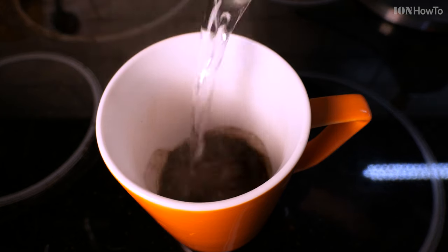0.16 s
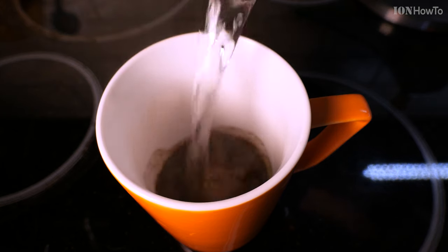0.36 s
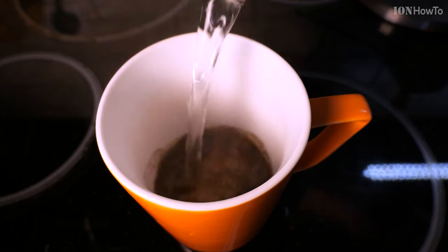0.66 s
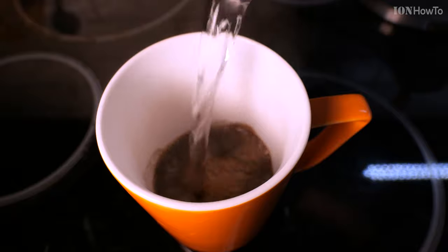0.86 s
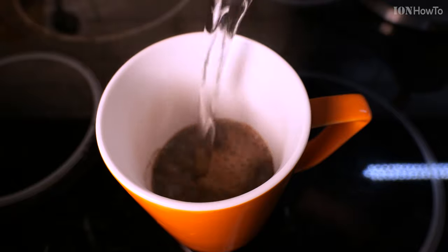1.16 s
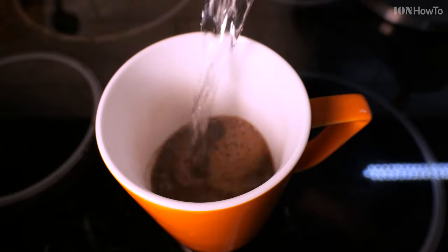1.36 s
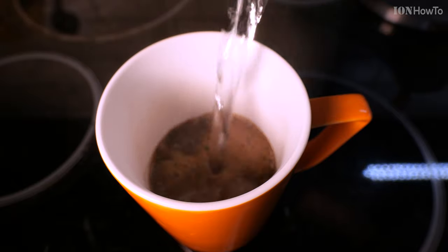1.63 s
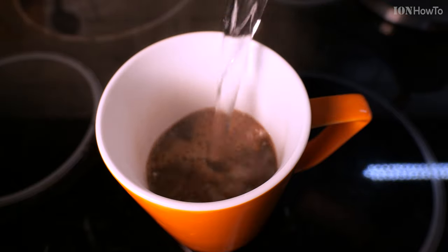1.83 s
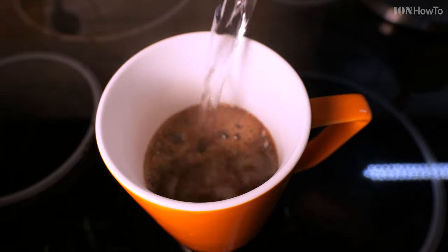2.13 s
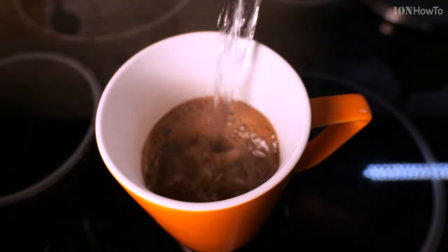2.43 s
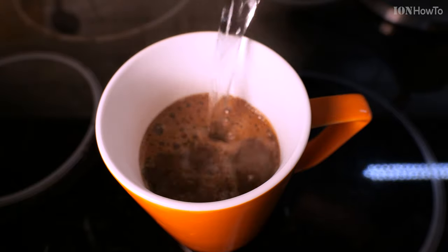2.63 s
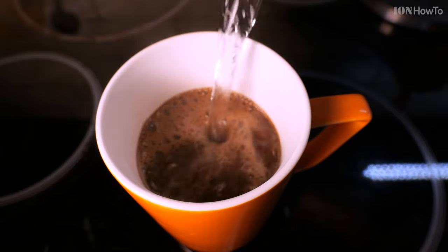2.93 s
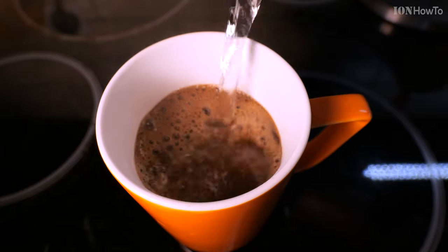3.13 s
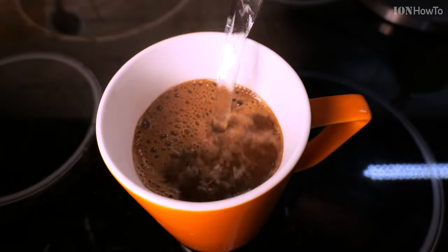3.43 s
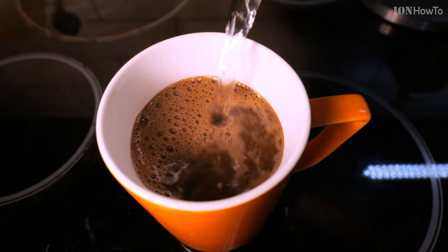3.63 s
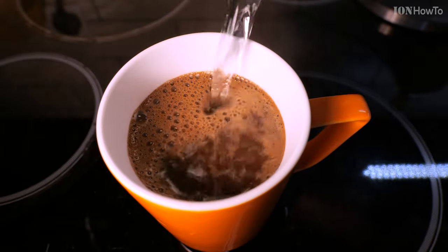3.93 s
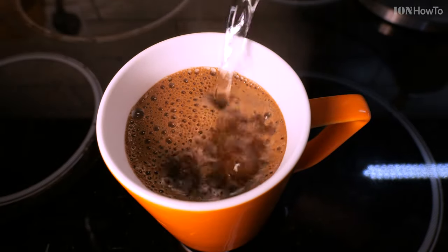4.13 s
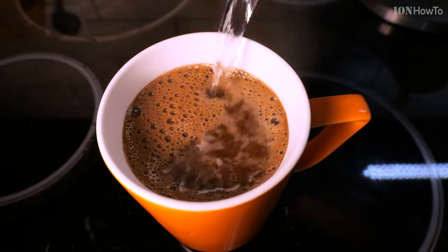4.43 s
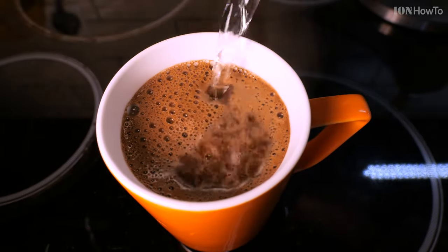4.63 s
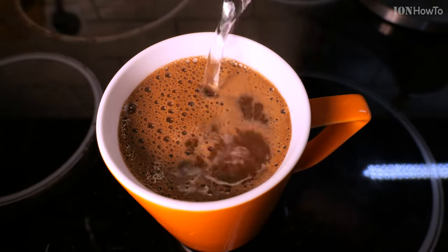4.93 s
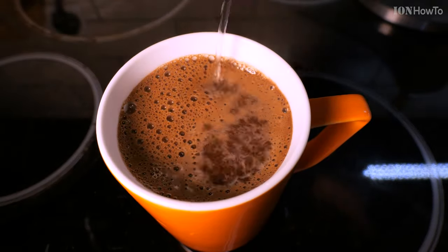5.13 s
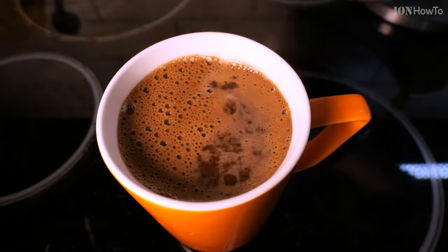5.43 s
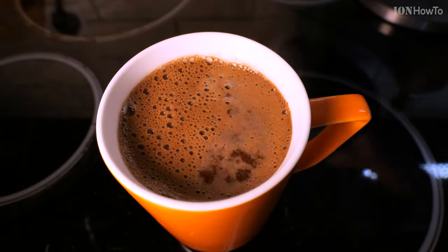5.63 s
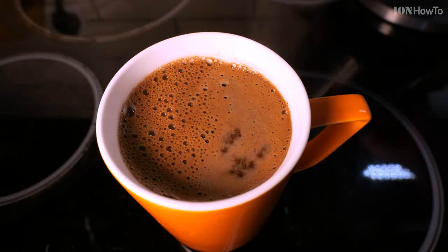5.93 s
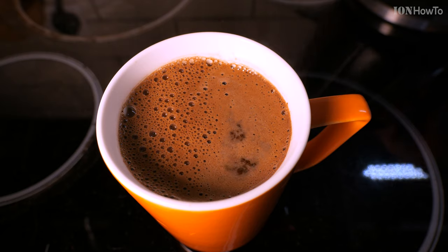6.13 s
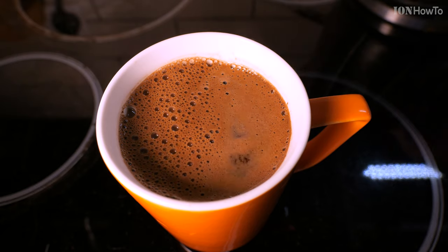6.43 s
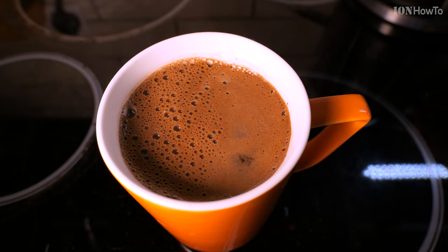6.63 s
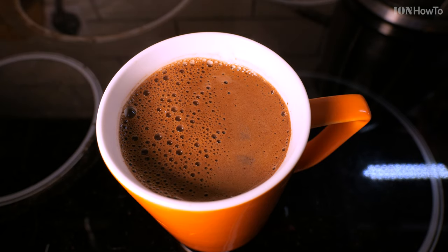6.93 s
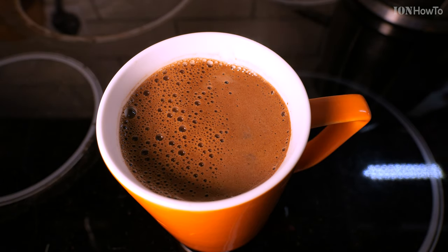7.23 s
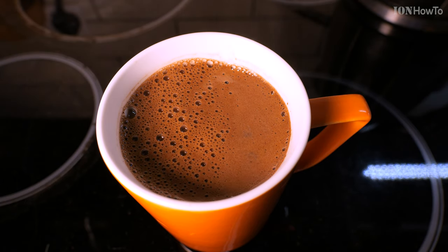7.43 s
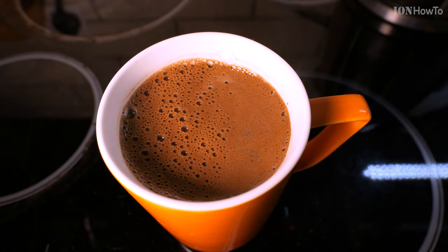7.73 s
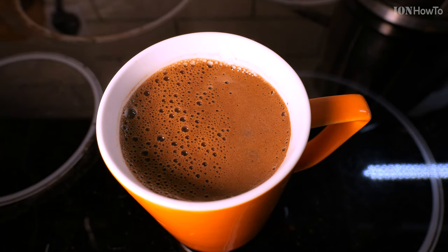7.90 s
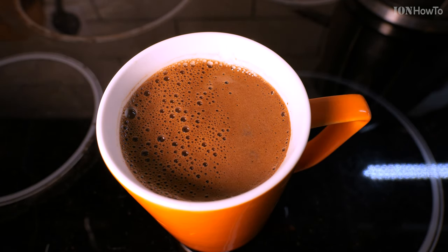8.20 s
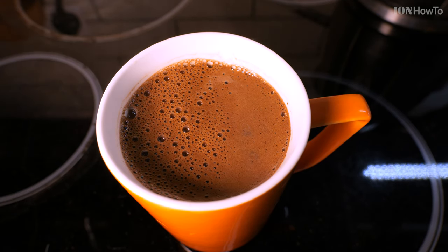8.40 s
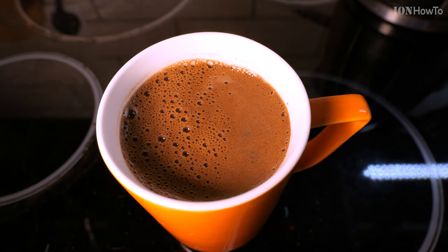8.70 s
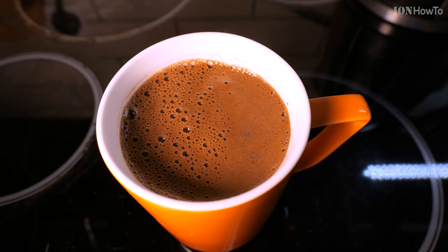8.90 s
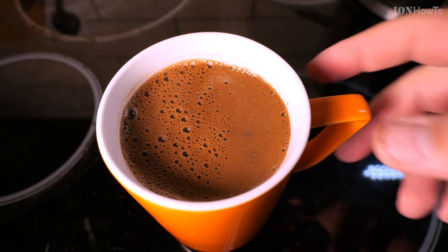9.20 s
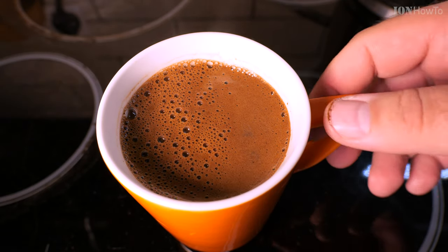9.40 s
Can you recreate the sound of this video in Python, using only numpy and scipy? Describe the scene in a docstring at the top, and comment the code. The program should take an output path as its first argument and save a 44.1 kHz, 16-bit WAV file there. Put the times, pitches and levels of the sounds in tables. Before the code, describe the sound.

Close stereo view of a kitchen counter: a stream of hot water splashes vigorously into a ceramic mug, plopping, bubbling and ticking on the walls. Its hollow tone rises and the splashing softens as the mug fills. The pour stops, water sloshes inside the swinging kettle, and the kettle lands on its base to the right with a flurry of hollow knocks and clacks. A soft hiss and murmur remain over a very deep hum that grows.

```python
"""Water pours from a kettle into a ceramic mug in a kitchen, plopping and spattering over a deep hum.
Droplets and lumps are clicks and noise puffs that ring the mug; bubbles are short rising sines.
The air above the water is a resonance that rises in pitch. The kettle swings away, sloshes (bubble
noise through moving hollows) and knocks onto its base (struck modes, cracks). From the last of the
swing onward its water murmurs, while something hisses nearby (banded noise)."""
import sys
import numpy as np
from scipy import signal
from scipy.io import wavfile

SR = 44100
rng = np.random.default_rng(int(sys.argv[2]) if len(sys.argv) > 2 else 0)


def volts_from_db(level):
    """Convert decibel levels to linear amplitude ratios."""
    exponent = np.asarray(level, float) / 20
    return 10 ** exponent


def to_wav(s):
    """Save 16-bit WAV."""
    ch = np.atleast_2d(s).T  # columns
    pcm = np.round(np.clip(ch, -1, 1) * 32767)  # PCM
    wavfile.write(sys.argv[1], SR, pcm.astype(np.int16))


N = 421596
T = np.arange(N) / SR

# Levels are relative unless noted.
# appliance hum [t/s, level/dB]; faint steady lines [f/Hz, level/dB]
HUM = [(0.0, -20.5), (1.15, -19), (1.3, -22.5), (1.8, -19.5), (2.8, -17), (3.0, -20.5), (3.88, -15),
       (4.13, -23.5), (4.25, -17), (5.75, -15.5), (6.0, -20), (6.6, -15.5), (7.15, -25), (7.3, -14.5),
       (7.7, -12), (7.9, -13.5), (8.7, -9.5), (9.56, -8.5)]
MOTOR_LINES = [(74, -61), (113, -63), (487, -51)]
HUM_HZ, HUM_WAVER_DB = 37.24, 1.47
# lumpy counter rumble [t/s, level/dB]
THUDDING = [(0.0, -31), (1.0, -34.5), (1.4, -28.5), (2.0, -31), (2.65, -32), (3.3, -34.5), (5.8, -37),
            (6.12, -28), (6.5, -25.5), (6.9, -15), (7.2, -25), (7.35, -31.5), (9.56, -32)]
# weight coming down on the counter [t/s, peak level/dB]
THUMPS = [(1.201, -51), (1.345, -24), (6.456, -16), (6.558, -12), (6.687, -8), (6.807, -8), (6.89, -7.5),
          (6.972, -7)]
# counter modes [f/Hz, level/dB, t60/s]
COUNTER = [(43.5, 4, 0.47), (63.2, -7, 0.86), (84.2, -7.5, 0.39)]
THUD_LUMPS_DB = 2
# room noise density [f/Hz, level/dB]
ROOM_COLOUR = [(26, -61), (45, -6), (67, -27), (92, -13.5), (271, -35.5), (432, -22.5), (488, -35.5),
               (760, -29.5), (1510, -37), (2300, -39), (6140, -43.5), (13500, -50.5), (16000, -49)]
ROOM_DB = -39.5
# left-right correlation of room and hiss [f/Hz, correlation/1]
LIKENESS = [(60, 1), (130, 0.98), (290, 0), (640, 0), (3000, 0)]

# hiss [t/s, level/dB]; added treble, above 7.7 kHz [t/s, level/dB]
HISS = [(5.4, -58), (5.9, -46.5), (5.98, -38.5), (6.35, -44.5), (6.9, -40.5), (7.1, -45.5), (7.4, -42.5),
        (7.55, -35), (7.685, -38), (7.705, -36), (8.15, -36.5), (8.22, -37.5), (8.28, -33), (8.38, -41.5),
        (9.2, -42.5), (9.26, -36.5), (9.31, -40), (9.56, -49)]
HISS_TREBLE = [(5.4, -28), (7.68, -22), (7.7, -4), (8.0, -0.5), (8.3, -5), (8.4, -37), (9.56, -1)]
# hiss noise density [f/Hz, level/dB]
HISS_COLOUR = [(1290, 7), (2200, -1.5), (2830, 9), (4380, -0.5), (6610, 4), (10400, -4.5), (15200, -14),
               (16000, -17), (16400, -35)]
HISS_FLICKER_DB = 0.7

# water sloshing as the kettle swings [t/s, deep level/dB, hollow level/dB]
SWING = [(5.2, -60, -57), (5.39, -56, -43.5), (5.71, -48.5, -37), (5.85, -44.5, -41.5), (6.0, -35, -31.5),
         (6.16, -33, -30), (6.54, -43, -34.5), (7.09, -39, -39), (7.3, -59, -45), (7.4, -65, -51)]
# fixed resonances of the slosh, deep and hollow [f/Hz, width/Hz, level/dB]
DEEP = [(202, 32, 1), (267, 73, -2.5), (333, 22, -1)]
HOLLOW = [(570, 120, 1.5), (1720, 630, -6.5), (3900, 7600, -15.5)]
# two hollows that shift as the kettle tips back
# [t/s, low f/Hz, high f/Hz, low level/dB, high level/dB]
SLOSH = [(5.2, 940, 2900, 8, -14), (5.55, 870, 2800, -2, -19), (5.72, 840, 2590, 9.5, -2.5),
         (5.87, 850, 2500, 7, -12), (6.02, 920, 2570, 4, -2.5), (6.2, 746, 2500, 6, -6.5),
         (6.5, 790, 2480, 4, -2.5), (7.4, 800, 2500, 3, -2)]
# murmur of the kettle's water, from the last of the swing onward [t/s, level/dB]
MURMUR = [(5.9, -39), (6.3, -27), (6.6, -23.5), (7.11, -29), (9.56, -32.5)]
# resonances of the kettle's body [f/Hz, width/Hz, level/dB]
BODY = [(189.7, 25.6, 2), (287, 139, -3), (338.7, 28.4, 5.5), (359, 28.6, 1.5), (489, 62, -6),
        (661, 47, -12.5), (1148, 160, -13), (1814, 100, -18)]
# dull note near 620 Hz that swells at the end [t/s, level/dB]
LATE_NOTE = [(9.0, -67), (9.25, -40.5), (9.56, -35.5)]
KETTLE_LAG_S, KETTLE_SHARED = 0.00114, 0.14   # delayed share of the right side in the left

# kettle meeting its base [t/s, knock peak level/dB, body level/dB, knock f/Hz, clack level/dB]
KNOCKS = [(6.185, -24, -22, 810, -39), (6.341, -6.5, -9, 790, -28), (6.348, -17, -13, 760, -35),
          (6.4251, -9, -11.5, 910, -8.5), (6.539, -10, -6, 570, -26), (6.574, -6, -5, 844, -26),
          (6.614, -20, -35, 930, -26.5), (6.693, -9.5, -18, 820, -23), (6.722, -15, -46, 1310, -20),
          (6.802, -12, -23, 685, -29), (6.812, -20, -32, 950, -28), (6.87, -16, -39, 1350, -19.5),
          (6.884, -37, -37, 554, -24), (6.925, -12, -20, 664, -13.5), (7.015, -11.5, -35, 820, -24),
          (7.078, -18, -45, 666, -23.5), (7.211, -40, -23, 552, -32.5)]
# modes of shell and clack [f/Hz, level/dB, t60/s]
SHELL = [(327, 3, 0.24), (348, -8, 0.13), (291, -5, 0.06), (206, -18, 0.22), (85.4, -5, 0.26)]
CLACK = [(1560, 9.5, 0.022), (2230, 3, 0.016), (1010, -10, 0.05), (2420, -19, 0.042)]
# sharp cracks as it seats [t/s, peak level/dB, centre f/Hz]
CRACKS = [(6.342, -23.5, 3300), (6.425, -33, 6000), (6.537, -27, 3600), (6.616, -20, 3320),
          (6.624, -22, 7200), (6.869, -14.5, 5570), (6.877, -28, 6450), (6.883, -22, 2960),
          (6.889, -29, 5500), (6.934, -29, 5000), (6.927, -32, 4200), (7.078, -24.5, 4500),
          (7.132, -26, 3600), (7.209, -29, 3280)]
# small lid ticks as the kettle swings [t/s, f/Hz, peak level/dB]
TICKS = [(5.635, 3020, -34), (5.97, 3220, -32), (6.16, 1770, -33), (6.161, 2300, -46), (6.192, 2330, -27),
         (6.2, 2700, -21), (6.285, 1700, -33)]

# vigour of the stream [t/s, level/dB]
STREAM = [(0.0, 5.5), (0.23, 1.5), (0.86, 0), (1.28, -2.5), (1.53, 0), (1.79, -3), (2.1, -4), (2.45, -1),
          (2.88, -3.5), (3.61, -5), (4.0, -6), (4.15, -6.5), (4.76, -6.5), (5.08, -9), (5.5, -7)]
# rows: deep gurgle, gurgle, air column, coarse spray, fine spray
# [level at zero vigour at 0 s/dB, share of the vigour/1, change/(dB/s)]
LAYERS = [(-39.5, 1.35, 0), (-37.5, 1.8, -1.2), (-37.5, 1.6, -1.13), (-40, 1.66, 0), (-39.5, 1.27, -0.8)]
POURING_S, KETTLE_S, POUR_ENDS_S = (0, 5.7), (5.1, 9.6), 5.3
# droplets on the wall at set times, loud and faint [t/s, peak level/dB, f/Hz: puff centre is 1.07 f]
SPATTERS = [(0.036, -15, 4950), (0.0822, -18.5, 4680), (0.1111, -7.5, 6100), (0.169, -7, 3500),
            (0.198, -7, 4800), (0.3082, -19, 3300), (0.3592, -11.5, 3280), (0.4189, -13.5, 3280),
            (0.429, -13.5, 4740), (0.52, -23, 3340), (0.605, -18, 3230), (0.7014, -21, 3400),
            (0.7674, -18, 3340), (0.798, -16.5, 3300), (0.832, -26, 3470), (0.846, -36, 3770),
            (0.9063, -19, 3000), (1.1667, -13, 3620), (1.2286, -21, 3250), (1.3364, -6, 3520),
            (1.3907, -18, 4300), (1.4654, -16.5, 3290), (1.5287, -25, 3260), (1.585, -20, 7400),
            (1.726, -26, 7200), (1.888, -37, 7300), (2.0172, -21, 7840), (2.2573, -22, 8950),
            (2.397, -18, 5400), (2.409, -19, 2980), (2.439, -20.5, 7100), (2.469, -39, 8050),
            (2.5174, -20.5, 6840), (2.613, -12, 7400), (3.1234, -23, 3700), (3.186, -25, 3480),
            (3.3663, -14, 3840), (3.6332, -18.5, 6205), (3.777, -23.5, 7000), (3.8113, -20, 5770),
            (3.9084, -23, 2330), (4.0195, -21.5, 2740), (4.1503, -25, 2920), (4.2005, -28, 2920),
            (4.2116, -11, 3280), (4.289, -20, 3550), (4.72, -22, 6850), (5.1076, -20.5, 2700),
            (5.226, -26.5, 4330)]
# lower wall, soon under water [f/Hz, width/Hz, level/dB]
GLAZE = [(3280, 36, 2), (3870, 21, -8), (4330, 97, -13), (4970, 50, -1), (5020, 24, -3)]
# rim resonances [f/Hz, width/Hz, level/dB]
RIM = [(6570, 430, -5), (10400, 3700, -11.5)]
WHISTLE_HZ, WHISTLE_SAG_HZ_PER_S = 8320, 540   # spray whistle sinks as the mug fills
WALL_RING_DB = -3   # how much a spatter rings the wall

# air column in the mug [t/s, f/Hz, strength/dB, wall ring/dB]
AIR = [(0, 696, 5.5, -25.5), (.25, 740, 4.5, -31.5), (.8, 840, -1.5, -22), (1.05, 970, -6, -28),
       (1.2, 975, -1.5, -28.5), (2.2, 1226, 1.5, -24.5), (2.7, 1550, -4, -25.5), (3.2, 1800, 6, -30),
       (4, 1900, 6.5, -38), (5.4, 1800, 5, -38)]
# wall modes near the air column [f/Hz, level/dB, t60/s]
MUG = [(1280, -7.5, 0.0053), (1550, 2, 0.013), (1710, 4, 0.0066), (1820, 2, 0.011)]
AIR_WIDTH_HZ, AIR_WIDENS = 244, 1.66   # width at 1 kHz; power of pitch by which it grows
DIRECT_ON_WALL = 0.22   # share of the splash that shakes the wall without the air column
WALL_HZ, WALL_RISE_HZ_PER_S, WALL_DB = 1100, 3.1, 41.5   # lowest wall mode, pulled about by the water
WALL_WANDER_HZ, WALL_WIDTH_HZ = 22, 58

# lumps of water landing at set times, loud and faint [t/s, peak level/dB, plop level/dB]
LUMPS = [(0.034, -21, -41), (0.098, -7.5, -52), (0.166, -11, -29), (0.168, -16, -20.5), (0.197, -4.5, -19),
         (0.3705, -13, -23.5), (0.415, -9.5, -51), (0.511, -24, -24.5), (0.6066, -21, -46),
         (0.7021, -18, -24), (0.9069, -17, -43), (1.1656, -12, -21), (1.336, -10, -19.5),
         (1.3939, -21, -33), (1.4643, -9, -27.5), (1.5668, -15, -28), (1.5864, -14, -29),
         (1.711, -18.5, -43), (1.783, -28, -30), (1.834, -27, -37), (1.85, -21.5, -27.5),
         (1.897, -33, -27.5), (1.927, -37, -27), (1.95, -46, -30), (1.994, -38, -33), (2.0188, -27, -39),
         (2.103, -25, -63), (2.18, -23, -35), (2.2108, -19.5, -23.5), (2.3314, -19.5, -43),
         (2.3776, -27, -31), (2.4387, -18, -27), (2.5175, -17.5, -34), (2.558, -13, -28), (2.6126, -7, -21),
         (2.6818, -19, -32), (2.781, -23, -53), (2.832, -16.5, -27.5), (3.1235, -27, -50),
         (3.46, -24.5, -40), (3.5213, -21, -46), (3.633, -14.5, -28.5), (3.675, -22, -40),
         (3.8479, -24, -38), (3.908, -18.5, -34), (3.9297, -21.5, -38), (3.9885, -22.5, -33),
         (4.0192, -19, -31), (4.495, -22.5, -54), (5.0509, -20.5, -47), (5.107, -22.5, -34),
         (5.239, -26, -42)]
# first clear notes: short bubbles of rising pitch, some near 1100 Hz [t/s, f/Hz, peak level/dB]
FIRST_NOTES = [(0.006, 507, -17.5), (0.03, 730, -31), (0.058, 750, -30), (0.085, 806, -15),
               (0.108, 720, -13), (0.128, 705, -20), (0.148, 700, -20), (0.215, 640, -32),
               (0.305, 744, -19), (0.417, 855, -18), (0.466, 530, -18.5), (0.482, 567, -26),
               (0.394, 1290, -20), (0.51, 503, -25), (0.535, 1090, -27), (0.605, 1100, -23),
               (0.765, 1070, -26), (0.845, 593, -26.5), (0.905, 1560, -24), (0.906, 845, -23),
               (0.987, 542, -23.5), (0.99, 1710, -26), (0.62, 800, -29), (0.48, 835, -23)]
PLOP_HZ, PLOP_SPREAD_OCT = 546, 0.15
NOTE_DB, NOTE_FADE_DB_PER_S, NOTE_SPREAD_OCT = -34, 0.5, 0.455   # bubbles near the air column's pitch
DEEP_SWELL_S, DEEP_SWELL_WIDTH_S, DEEP_SWELL_DB = 1.86, 0.3, 8.5   # one swell of the deep gurgle
# further events at random times; SMALL_FOLLOWS: share of the vigour in their size
SMALL_LUMP_DB, SMALL_PLOP_DB, SMALL_SPATTER_DB = -31, -44.5, -30.5
SMALL_SPREAD_DB, SMALL_FOLLOWS = 5, 0.76


def rms_one(x):
    """Scale to rms 1."""
    return x / np.sqrt(np.mean(x ** 2) + 1e-20)


def in_time(rows, fade=None):
    """Columns joined by straight lines; outside the table the value is fade, or the end is held."""
    s, *columns = np.transpose(rows)
    return [np.interp(T, s, c, left=fade, right=fade) for c in columns]


def at_hz(points, hz):
    """Read a spectrum on a log-frequency axis."""
    points = np.array(points)
    return np.interp(np.log(hz), np.log(points[:, 0]), points[:, 1])


def drift(rate_hz):
    """Slow random wander, rms 1: noise through two equal poles, run at SR / 40."""
    r = np.exp(-80 * np.pi * rate_hz / SR)
    noise = rng.standard_normal(N // 40 + 2002)
    slow = signal.lfilter([1], [1, -2 * r, r * r], noise)[2000:]
    return np.interp(np.arange(N) / 40, np.arange(len(slow)), rms_one(slow))


def band(x, low_hz, high_hz):
    """Butterworth band-pass."""
    edges_hz = [low_hz, min(high_hz, .45 * SR)]
    return signal.sosfilt(signal.butter(2, edges_hz, "band", fs=SR, output="sos"), x + 1e-18)


def peak(hz, width_hz):
    """Coefficients of a resonance with gain 1 on top."""
    r = np.exp(-np.pi * width_hz / SR)
    return (1 - r * r) / 2 * np.array([1, 0, -1]), [1, -2 * r * np.cos(2 * np.pi * hz / SR), r * r]


def through(x, peaks, start_s, end_s):
    """Resonances in parallel, signs alternating, sounding between two times."""
    out, part = np.zeros(x.shape), slice(int(start_s * SR), int(end_s * SR))
    for k, (hz, width_hz, db) in enumerate(peaks):
        out[..., part] += (-1) ** k * volts_from_db(db) * signal.lfilter(*peak(hz, width_hz), x[..., part])
    return out


def gliding(x, hz, width_hz):
    """A resonance whose centre moves, stepped block by block."""
    out, state = np.zeros(x.shape), np.zeros((*x.shape[:-1], 2))
    for i in range(0, N, 512):
        block = x[..., i:i + 512]
        out[..., i:i + 512], state = signal.lfilter(*peak(hz[i], width_hz[i]), block, zi=state)
    return out


def ring(clicks, hz, t60_s):
    """A unit click sets a damped sine of starting height 1 ringing."""
    r, w = volts_from_db(-60 / (t60_s * SR)), 2 * np.pi * hz / SR
    return signal.lfilter([0, np.sin(w)], [1, -2 * r * np.cos(w), r * r], clicks + 1e-18)


def train(times_s, db):
    """Clicks at given times."""
    out = np.zeros(N)
    out[np.round(np.asarray(times_s) * SR).astype(int)] = volts_from_db(db)
    return out


def struck(s, db, modes):
    """Every blow rings all modes, each with a strength of its own."""
    scatter_db = rng.normal(0, 2, (len(s), len(modes)))
    out = 0
    for k, (hz, level_db, t60_s) in enumerate(modes):
        out = out + ring(train(s, db + level_db + scatter_db[:, k]), hz, t60_s)
    return out


def grains(per_s, spread_db):
    """Random clicks of either sign with a long tail of large ones."""
    size = volts_from_db(spread_db * np.minimum(rng.exponential(1, N), 4))
    return (rng.random(N) < per_s / SR) * size * rng.choice([-1, 1], N)


def burst(clicks, t60_s, channels=()):
    """Every click starts a puff of noise that dies away."""
    envelope = signal.lfilter([1], [1, -volts_from_db(-60 / (t60_s * SR))], np.abs(clicks) + 1e-18)
    return envelope * rng.standard_normal((*channels, N))


def add(out, s, sound):
    """Mix a short sound in at time s."""
    i = round(s * SR)
    out[..., i:i + sound.shape[-1]] += sound[..., :N - i]


def bubble(hz, db, cycles, rise):
    """A damped sine whose pitch climbs, as in a closing cavity."""
    t = np.arange(2000) / SR
    phase = 2 * np.pi * hz * t * (1 + rise * t * hz / cycles)
    return volts_from_db(db) * np.exp(-t * hz / cycles) * np.sin(phase)


def puff(hz, db, t60_s, octaves):
    """A short crack of noise, octaves either side of hz, partly different on the two sides."""
    white = rng.standard_normal((3, 2400))
    noise = band(white[:2] + 0.76 * white[2], hz / 2 ** octaves, hz * 2 ** octaves)[:, 400:]
    t = np.arange(2000) / SR
    fade = volts_from_db(-60 * t / t60_s) * np.minimum(t / 0.00013, 1)
    return volts_from_db(db) * rms_one(noise * fade) * np.sqrt(np.mean(fade ** 2))


def banded_noise(spectrum, patchy_db, start_s):
    """Half-octave stereo noise bands, each with its level, flicker and likeness; rms 1 above the bass."""
    out, edges_hz = 0, 23.27 * 2 ** np.arange(0, 10, .5)
    first = int(start_s * SR)
    white = rng.standard_normal((2, 2, N - first))
    for k, (low_hz, high_hz) in enumerate(zip(edges_hz, edges_hz[1:])):
        hz = np.sqrt(low_hz * high_hz)
        if hz < spectrum[0][0]:
            continue
        mid, side = band(white[k % 2], low_hz, high_hz)
        alike = np.clip(at_hz(LIKENESS, hz), -1, 1)
        gain = volts_from_db(at_hz(spectrum, hz) + patchy_db * drift(16.0)[first:])
        out = out + gain * (np.sqrt(1 + alike) * mid + np.sqrt(1 - alike) * side * [[1], [-1]])
    return np.pad(out / np.std(band(out, 102.0, 11300)), [(0, 0), (first, 0)])


def heard(x, lag_s, near_db, near_t60_s, far_db, far_t60_s):
    """Direct sound, reflections off counter and tiles, then the room; unrelated on the two sides."""
    t = np.arange(16000) / SR
    near = volts_from_db(near_db - 60 * t / near_t60_s) * rng.standard_normal((2, len(t))) * (t > .0004)
    far_noise = band(rng.standard_normal((2, len(t))), 67, 11000)
    far = volts_from_db(far_db - 60 * t / far_t60_s) * far_noise * (t > .006)
    response = near + far
    response[0, 0] += 1
    response[1, round(abs(lag_s) * SR)] += 1
    return signal.fftconvolve(x[None], response, axes=1)[:, :N]


def room_air():
    """Steady broadband room noise with a slight flicker in each band."""
    return volts_from_db(ROOM_DB) * banded_noise(ROOM_COLOUR, patchy_db=2.5, start_s=0)


def hum():
    """A wavering motor tone with a few faint steady lines."""
    db, = in_time(HUM)
    phase = 2 * np.pi * np.cumsum(HUM_HZ + .5 * drift(3.35)) / SR
    tone = np.sqrt(2) * volts_from_db(db + HUM_WAVER_DB * drift(7.5)) * np.sin(phase)
    tone = tone + volts_from_db(-34.0) * np.roll(tone, 300) * [[1], [-1]]   # slightly out of step between the sides
    for hz, line_db in MOTOR_LINES:
        tone = tone + np.sqrt(2) * volts_from_db(line_db + 1.2 * drift(0.46)) * np.sin(2 * np.pi * hz * T)
    return tone


def thudding():
    """Lumpy low noise and a few heavy thumps from the counter, nearly the same on both sides."""
    mid, side = band(band(rng.standard_normal((2, N)), 52.5, 105.5), 29.0, 253)
    stereo = rms_one(mid) * volts_from_db([[1.2], [-1.2]]) + volts_from_db(-13.5) * rms_one(side) * [[1], [-1]]
    rumble = volts_from_db(in_time(THUDDING)[0] + THUD_LUMPS_DB * drift(7.5)) * stereo
    return rumble + band(struck(*np.transpose(THUMPS), COUNTER), 30, 90)


def hissing():
    """Coloured noise with a treble part that comes and goes."""
    noise = banded_noise(HISS_COLOUR, patchy_db=HISS_FLICKER_DB, start_s=KETTLE_S[0])
    hiss = volts_from_db(in_time(HISS, fade=-99)[0]) * noise
    return hiss + volts_from_db(in_time(HISS_TREBLE)[0]) * band(hiss, 7700.0, SR / 2)


def kettle_swarm(per_s):
    """Random clicks for each side; the left also gets a late, weak share of the right."""
    x = np.array([grains(per_s, 2.3) for side in range(2)])
    return x + KETTLE_SHARED * np.array([np.interp(T - KETTLE_LAG_S, T, x[1]), 0 * T])


def kettle_water():
    """Waves, and dense bubbles heard through the kettle's body, differently on each side."""
    deep_db, hollow_db = in_time(SWING, fade=-99)
    murmur_db, = in_time(MURMUR, fade=-99)
    waves, bubbles = kettle_swarm(700.), kettle_swarm(1500.)
    deep = volts_from_db(deep_db + 7.0) * rms_one(band(through(waves, DEEP, *KETTLE_S), 150, 430))
    low_hz, high_hz, low_db, high_db = in_time(SLOSH)
    moving = volts_from_db(low_db) * gliding(waves, low_hz, np.full(N, 200.))
    moving = moving + volts_from_db(high_db) * gliding(waves[::-1], high_hz, np.full(N, 400.))
    cavity = through(waves, HOLLOW, *KETTLE_S) + moving * (T > KETTLE_S[0])
    hollow = volts_from_db(hollow_db - 3.0) * rms_one(band(cavity, 380, 4300))
    note = through(bubbles, [(630, 51.0, 0)], *KETTLE_S)
    note = volts_from_db(in_time(LATE_NOTE, fade=-99)[0]) * note / np.std(note[:, -SR:])
    murmur = volts_from_db(murmur_db - 3.5) * rms_one(band(through(bubbles, BODY, *KETTLE_S), 107, 2100))
    return deep + hollow + note + murmur


def knocks():
    """Each contact, off to the right, rings the shell and gives a hollow knock, a clack and a crack."""
    s, peak_db, body_db, knock_hz, clack_db = np.transpose(KNOCKS)
    shell, clack = struck(s, body_db + 0.5, SHELL), struck(s, clack_db - 3.5, CLACK)
    knock, crack = np.zeros(N), np.zeros((2, N))
    for k in range(len(s)):
        add(knock, s[k], bubble(knock_hz[k], peak_db[k], cycles=4.0, rise=0.0058))
        low_crack = puff(650.0, peak_db[k] - 6.5, t60_s=0.065, octaves=0.66)
        add(crack, s[k], low_crack * volts_from_db([[-4.0], [0.1]]))
        add(crack, s[k], puff(2000.0, clack_db[k], t60_s=0.012, octaves=0.6))
    for when, db, hz in CRACKS:
        add(crack, when, puff(hz, db, t60_s=0.017, octaves=0.9))
    for when, hz, db in TICKS:
        add(knock, when, bubble(hz, db, cycles=18.0, rise=0.003))
    shell = np.array([np.interp(T - .0007, T, shell), shell * volts_from_db(-2.5)])
    knock = heard(knock + clack, 0.00095, -23, 0.014, -45.0, 0.25)
    knock = knock[::-1] * volts_from_db([[-6], [.3]])   # swapped: the right side leads
    knock = knock + volts_from_db(-6.5) * clack * [[1], [0]]
    echo = volts_from_db(-20.5) * heard(crack[0], 0.0074, -3.5, 0.064, -32.0, 0.34)
    return shell + knock + crack + echo


def stream_levels():
    """Every layer of the pour follows the vigour of the stream and changes steadily with time."""
    vigour_db = in_time(STREAM, fade=-99)[0]
    return [base_db + share * vigour_db + db_per_s * T for base_db, share, db_per_s in LAYERS]


def random_events(count):
    """Random moments of the pour, a size offset in dB and a share 0-1 for each."""
    when, size, share = rng.random((count, 3)).T
    when = when ** 1.25 * POUR_ENDS_S   # densest early on
    vigour_db = np.interp(when, *np.transpose(STREAM))
    return when, SMALL_SPREAD_DB * (2 * size - 1) + SMALL_FOLLOWS * vigour_db, share


def spray():
    """Droplets tick on the walls; the wash of them differs between the sides."""
    *_, coarse_db, fine_db = stream_levels()
    surge = volts_from_db(2.2 * drift(12))
    drops = burst(grains(450. * surge, 4.73), 0.0014, channels=(2,))
    drops = drops + 0.51 * surge * rng.standard_normal((2, N))
    early = np.interp(T, [0, 1.6, 2.2], [1, 1, .3])   # the rising water damps the lower wall
    coarse = rms_one(early * through(drops, GLAZE, *POURING_S) + volts_from_db(-7) * band(drops, 2600, 5800))
    whistle_db = np.interp(T, [1.3, 1.8, 4.0, 4.6], [-17, 0.5, 4.0, 2.5]) + 3.4 * drift(8.3)
    whistle_hz = WHISTLE_HZ - WHISTLE_SAG_HZ_PER_S * T
    whistle = volts_from_db(whistle_db) * gliding(drops, whistle_hz, np.full(N, 1000.0))
    fine = rms_one(whistle + through(drops, RIM, *POURING_S) + volts_from_db(-7.5) * band(drops, 4500, 10600))
    cracks = np.zeros((2, N))
    when, size_db, share = random_events(count=170)
    for s, db, hz in [*SPATTERS, *zip(when, SMALL_SPATTER_DB + size_db, 2800 * 3.5 ** share)]:
        add(cracks, s, puff(1.07 * hz, db - 6.5, t60_s=0.014, octaves=0.26))
        add(cracks, s, puff(5400.0, db - 3.0, t60_s=0.0024, octaves=1.8))
        add(cracks, s, puff(3300.0, db - 12.5, t60_s=0.065, octaves=1.42))
    wall = early * through(cracks, GLAZE, *POURING_S) + through(cracks, RIM, *POURING_S)
    return volts_from_db(coarse_db) * coarse + volts_from_db(fine_db) * fine + cracks + volts_from_db(WALL_RING_DB) * wall


def gurgling(low_hz, high_hz, per_s, cycles):
    """Random bubbles ringing a few cycles; each side hears a swarm of its own."""
    born = np.array([grains(per_s, 4.6) for side in range(2)])
    dealt = rng.integers(0, 6, N)   # which of six pitches
    out = 0
    for k, hz in enumerate(np.geomspace(low_hz, high_hz, 6)):
        out = out + ring(born * (dealt == k), hz, cycles / hz) * np.sqrt(hz)
    return rms_one(out)


def air_column(x):
    """The air above the water resonates higher as the mug fills, and drives the wall modes near it."""
    hz, strength_db, wall_db = in_time(AIR)
    air = gliding(x * volts_from_db(strength_db), hz, AIR_WIDTH_HZ * (hz / 1000) ** AIR_WIDENS)
    shake = (air + DIRECT_ON_WALL * x) * volts_from_db(wall_db)
    walls = sum(volts_from_db(db) * ring(shake, f_hz, t60_s) for f_hz, db, t60_s in MUG)
    lowest_hz = WALL_HZ + WALL_RISE_HZ_PER_S * T + WALL_WANDER_HZ * drift(8.8)
    lowest_drive = shake * np.interp(T, [.3, 1.15], [.55, 1])
    walls += volts_from_db(WALL_DB) * gliding(lowest_drive, lowest_hz, np.full(N, WALL_WIDTH_HZ))
    return signal.sosfilt(signal.butter(4, 2050., fs=SR, output="sos"), air + walls)


def pour():
    """Bubbles and the air column, driven by lumps at random and at set times, loud and faint."""
    deep_db, gurgle_db, air_db, *_ = stream_levels()
    small = grains(630.0 * volts_from_db(2.0 * drift(12)), 3.1)
    splash = burst(small, 0.0031) + 0.19 * rng.standard_normal(N)
    out = volts_from_db(air_db) * rms_one(air_column(splash))

    when, size_db, _ = random_events(count=520)
    random_lumps = [when, SMALL_LUMP_DB + size_db, SMALL_PLOP_DB + size_db]
    s, peak_db, plop_db = np.hstack([np.transpose(LUMPS), random_lumps])
    plop_hz = PLOP_HZ * 2 ** (PLOP_SPREAD_OCT * rng.standard_normal(len(s)))
    second_s = s + rng.uniform(0.00107, 0.00394, len(s))   # a lump lands in two parts
    lumps = train(s, peak_db + 22.5) - train(second_s, peak_db + 16.5)
    out += air_column(lumps + volts_from_db(-19.0) * burst(lumps, 0.0083))   # a slap, then the water falling back
    for k in range(len(s)):
        add(out, s[k], bubble(plop_hz[k], plop_db[k] + 15.5, cycles=0.9, rise=0.043))

    when, size_db, share = random_events(count=260)
    note_hz = np.interp(when, T, in_time(AIR)[0]) * 2 ** (NOTE_SPREAD_OCT * (2 * share - 1))
    note_db = NOTE_DB - NOTE_FADE_DB_PER_S * when + size_db
    for k in range(len(when)):
        add(out, when[k], bubble(note_hz[k], note_db[k], cycles=3.6, rise=0.042))
    for when, hz, db in FIRST_NOTES:
        add(out, when, bubble(hz, db, cycles=6.7, rise=0.024))

    swell_db = DEEP_SWELL_DB * np.exp(-((T - DEEP_SWELL_S) / DEEP_SWELL_WIDTH_S) ** 2)
    gurgle = volts_from_db(deep_db + swell_db) * gurgling(197.0, 331.0, 150., 24.0)
    gurgle = gurgle + volts_from_db(gurgle_db) * gurgling(480.0, 870.0, 250., 19.0)
    return heard(out, .0001, -31, 0.066, -32.0, 0.086) * volts_from_db(-3.0) + gurgle


def scene():
    """Sum of all sources, left and right."""
    background = room_air() + hum() + thudding() + hissing()
    return background + kettle_water() + knocks() + spray() + pour()


def top_cut(x):
    """Nothing passes above the cut-off."""
    return signal.sosfilt(signal.butter(12, 16510, fs=SR, output="sos"), x)


def record(dry):
    """Peaks are rounded, then the top is cut."""
    rounded = 1.235 * np.tanh(dry / 1.275)
    low_pass = signal.cheby2(12, 70, 16700, fs=SR, output="sos")   # 70 dB down from 16.7 kHz
    finished = np.clip(signal.sosfilt(low_pass, rounded), -1, 1)
    return top_cut(finished)


dry = scene()
out = record(dry)
to_wav(out)
```